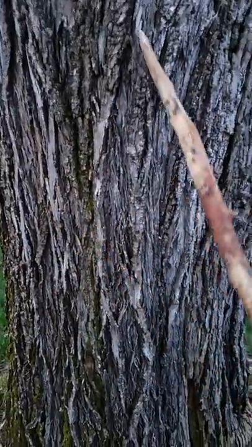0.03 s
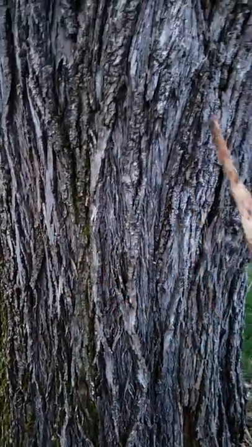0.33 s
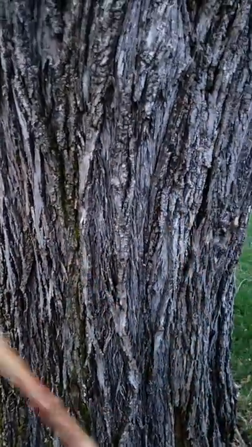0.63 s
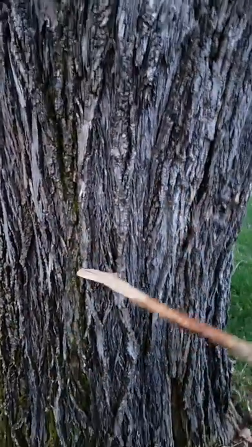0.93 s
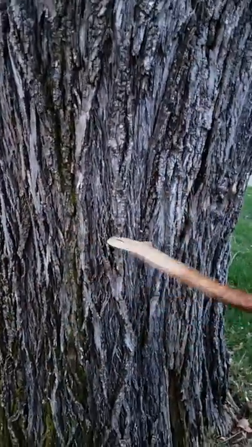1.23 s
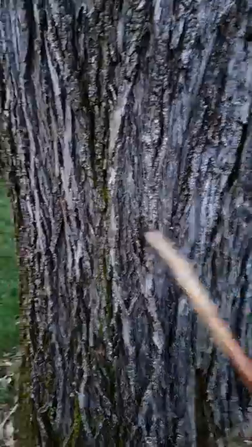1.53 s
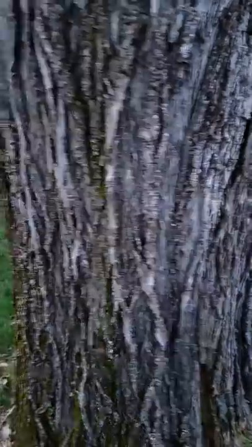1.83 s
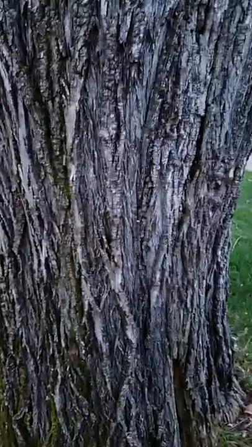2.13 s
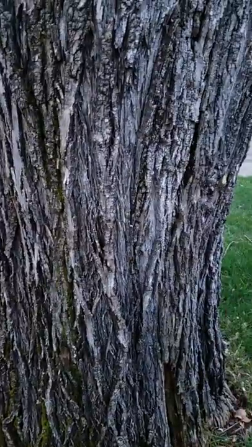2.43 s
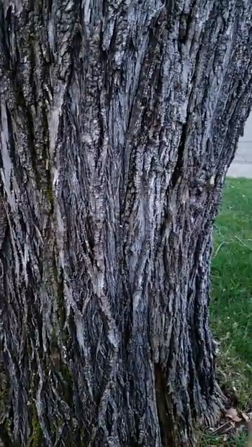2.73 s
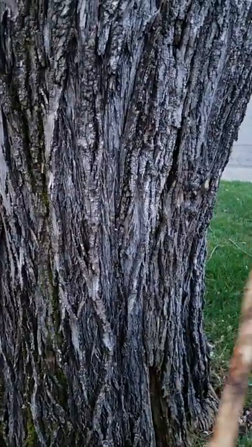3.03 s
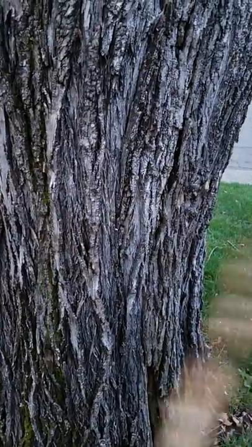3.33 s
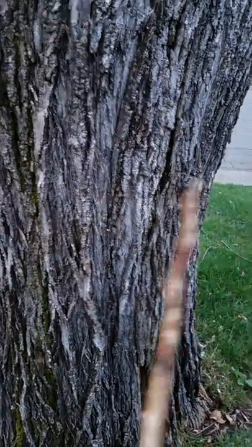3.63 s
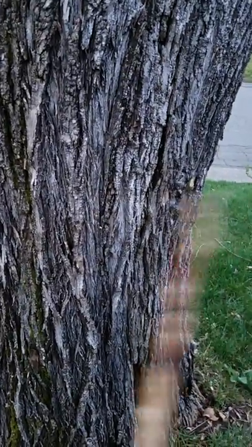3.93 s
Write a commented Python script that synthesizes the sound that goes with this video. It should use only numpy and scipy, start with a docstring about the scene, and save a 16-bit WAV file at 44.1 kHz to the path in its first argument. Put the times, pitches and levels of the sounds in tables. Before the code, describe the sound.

A wooden stick taps a tree trunk close by at about 0.3 and 0.7 seconds, followed by faint ticks and scrapes on the bark until 1.5. Sharp, dry strikes with a slight crunch land at 2.2 and 2.8 seconds, then the hardest at 3.3, 3.6 and 3.9. Faint town traffic hums outdoors throughout, with a barely audible distant siren falling and rising until about 2.3.

```python
"""Stick on a tree trunk

Outdoors in a garden, close to the microphone, a wooden stick taps, scrapes and then strikes a trunk.
Each contact rings the stick briefly, thocks the bark and crushes its crust; in hard blows the shaft
slaps down a few ms later. The garden returns a faint tail over low town noise and a very distant siren."""
import sys
import numpy as np
from scipy import signal
from scipy.fft import rfft, irfft
from scipy.io import wavfile
from scipy.ndimage import uniform_filter1d

SR = 44100
rng = np.random.default_rng(int(sys.argv[2]) if len(sys.argv) > 2 else 0)


def transcribe(signal):
    """Save signal, clipped to [-1, 1], as a 16-bit WAV file at the path in sys.argv[1]."""
    frames = np.atleast_2d(signal).T
    limited = np.clip(frames, -1, 1)
    pcm = np.round(limited * 32767).astype(np.int16)
    wavfile.write(sys.argv[1], SR, pcm)


N = 176400
T = np.arange(N) / SR
HIT_T = T[:8192]

# the tip meets the bark (time [s], stick ring [dB], stick tuning [ratio], thock pitch [Hz], thock [dB],
# rattle [dB], rattle tilt [dB/octave], crunch [dB])
TIP_KNOCKS = [(0.2594, -66, 1.4, 2000, -51, -51, -7.5, -28),
              (0.2622, -36, 1.02, 2510, -16.5, -29, -6.5, -42), (.27, -61, 1.3, 774, -39, -34, 5, -32.5),
              (0.288, -49, 0.92, 2280, -30, -35, -3.5, -32.5),
              (.3345, -46.5, 1.1, 1810, -32, -35, -16, -33.5), (.6718, -26.5, 1, 757, -14.5, -18, -7, -32),
              (0.6729, -37, 0.95, 2000, -12, -29.5, -3, -30), (.7318, -33, 1.11, 1740, -22, -32, -6, -37),
              (0.7421, -37, 1, 800, -42, -54, -8, -36), (0.777, -45.5, 1.05, 980, -48, -37, -16, -45.5),
              (1.004, -40, 1.18, 1590, -26.5, -37, -4.5, -41.5),
              (1.181, -39, 1.12, 1670, -38, -37, -5.5, -39),
              (2.1818, -24, 1.03, 745, -19, -23.5, -1.5, -28.5),
              (2.7502, -22.5, 0.98, 630, -28, -21, -3, -29),
              (3.3098, -20, 1.03, 2390, -5.5, -19.5, -5, -20),
              (3.5642, -19.5, 1, 2230, -7, -15.5, -1.5, -21), (3.89, -22, 1.065, 1750, -3.5, -19, -3, -26)]
# the shaft slaps the bark (time [s], level [dB], pitch [Hz])
SHAFT_SLAPS = [(2.1836, -15, 2740), (2.1899, -15, 2670), (2.753, -3.5, 3080), (3.313, -1, 3230),
               (3.5675, -6.5, 2670), (3.5727, -1.5, 3010), (3.8926, -3, 2750)]
# the tip drags over the bark; the last row is the stick swishing through the air (time [s], length [s], level
# [dB], resonance [Hz], relative grit [dB])
SCRAPES_AND_SWISH = [(-.02, 0.049, -46.5, 1170, 9), (0.765, 0.27, -64, 1910, 2), (1.005, 0.075, -59.5, 2230, 10),
                     (1.094, 0.094, -56, 2300, 10), (1.447, 0.039, -56, 1990, 40), (3.802, 0.2, -61.5, 2330, -18)]
# modes of the stick (frequency [Hz], relative level [dB], T60 [s])
STICK_MODES = [(297.3, -13, 0.059), (360.7, -7.5, 0.052), (469, -15, 0.072), (637, -17.5, 0.12),
               (698.6, -6.5, 0.043), (879, -14.5, 0.045), (1207, -7, 0.036), (1700, -22, 0.025),
               (1865, -8, 0.039), (2310, -9, 0.03), (2737, 6, 0.012), (4540, -31, 0.01)]
# spectra of loose bark, crust, slap, garden echoes and traffic (frequency [Hz], relative level [dB])
RATTLE_SPECTRUM = [(200, -29.5), (320, -4), (500, -8.5), (780, 3.5), (1000, -13.5), (2000, 2), (3300, 9.5),
                   (5500, -12.5), (16000, -41)]
CRUNCH_SPECTRUM = [(300, -26), (3500, 10), (6500, -10.5), (9000, -3), (16000, -1.5)]
SLAP_SPECTRUM = [(150, -36), (600, -15.5), (1400, -1), (2300, -20), (3300, 10), (6500, -4), (8500, -4),
                 (12000, -6.5), (16000, -23.5)]
GARDEN_SPECTRUM = [(100, -8), (300, 8), (700, 12), (1300, 7), (3000, 0.5), (8000, 5), (16000, 1.5)]
TOWN_SPECTRUM = [(15, -33.5), (28, -26), (60, -1.5), (85, -2), (120, -4), (175, -8), (260, -9), (350, -5),
                 (450, -7.5), (800, -10), (1250, -14.5), (2000, -22), (4000, -29), (7000, -37),
                 (10500, -35), (13000, -30.5), (16000, -30.5)]
# likeness of the traffic in left and right (frequency [Hz], coherence [0-1])
TOWN_COHERENCE = [(100, 0.95), (300, 0.81), (640, 0.57), (1400, 0.02), (3000, 0.04)]
# traffic at the microphone (time [s], level [dB])
TOWN_LEVELS = [(0, -59.5), (1.7, -60.5), (3.4, -59.5), (3.95, -56)]
# hums from the town (frequency [Hz], width [Hz], level [dB])
TOWN_HUMS = [(122.8, 6.3, -74.5), (356, 6.9, -73)]
# the distant siren (time [s], pitch [Hz], level [dB])
SIREN_WAIL = [(0, 1125, -61.5), (0.249, 1016, -74), (1, 869, -72), (1.459, 770, -68), (1.5, 1104, -92),
              (1.571, 1250, -68), (1.851, 1433, -75.5), (2.15, 1497, -78), (2.301, 1510, -86)]

# position at the microphone: delay and level of the left channel against the right
TIP_POSITION, SHAFT_POSITION = dict(lag_s=.00014, pan_db=1.2), dict(lag_s=.00045, pan_db=-.6)


def knocks():
    """Close up: the stick rings, the bark gives a dead thock, loose plates rattle, the crust crunches."""
    out, size = np.zeros((2, N)), len(HIT_T)
    hardest_db = max(row[5] for row in TIP_KNOCKS)
    thock_cycles, doubling_db = 10.7, 23
    for start, ring_db, tuning, thock_hz, thock_db, rattle_db, tilt_db, crunch_db in TIP_KNOCKS:
        ring = sum((-1) ** k * undb(db) * fade(t60, rise_s=.0016) * sine(hz * tuning)
                   for k, (hz, db, t60) in enumerate(STICK_MODES))
        thock = -fade(thock_cycles / thock_hz, rise_s=.00022) * sine(thock_hz)
        linger = 2 ** ((rattle_db - hardest_db) / doubling_db)  # softer blows die sooner
        rattle = colour(rng.standard_normal(size), RATTLE_SPECTRUM, tilt_db)
        rattle *= fade(t60_s=.043 * linger, rise_s=.00015)
        crunch = colour(grit(size), CRUNCH_SPECTRUM) * fade(t60_s=.045 * linger, rise_s=.00015)
        bark = undb(thock_db) * thock + undb(rattle_db) * rattle + undb(crunch_db) * crunch
        place(out, start, undb(ring_db) * ring + bark, **TIP_POSITION)
    return out


def slaps():
    """The shaft lands, hard wood on hard bark: a sharp click, a very short ring and a spray of chips."""
    out, crack = np.zeros((2, N)), click(SLAP_SPECTRUM)
    for start, db, hz in SHAFT_SLAPS:
        ring = fade(t60_s=.0051) * sine(hz)
        chips = colour(grit(len(HIT_T)), SLAP_SPECTRUM) * fade(t60_s=.024)
        slap = undb(3) * crack + undb(-4.5) * ring + undb(-19.5) * chips
        place(out, start, undb(db) * slap, **SHAFT_POSITION)
    return out


def scrapes(catch_s=.0015, catch_db=3):
    """The tip catches and slips on the crust: uneven clumps of fine cracks through a broad resonance. The same
    rough noise, faint and bright, makes the swish of the stick swinging near 3.8 s."""
    out, span = np.zeros((2, N)), N // 8
    clump = np.arange(span) // int(catch_s * SR)
    for start, length, db, hz, grit_db in SCRAPES_AND_SWISH:
        cracks = grit(span) * undb(catch_db * rng.standard_normal(span))[clump]
        rub = resonate(cracks, hz, hz / 2) + undb(grit_db) * colour(cracks, CRUNCH_SPECTRUM)
        size = int(length * SR)
        stroke = unit(rub[:size]) * signal.windows.tukey(size, .6)
        place(out, start, undb(db) * stroke, **TIP_POSITION)
    return out


def garden(stick, bounce_s=.02, bounce_top_hz=1550):
    """Around the microphone: scatter from close by, a faint longer tail, a dull bounce off the ground."""
    t, out = T[:N // 6], []
    dull = signal.butter(2, bounce_top_hz, fs=SR, output="sos")
    for channel in stick:
        echoes = [colour(rng.standard_normal(len(t)), GARDEN_SPECTRUM) * fade(t60_s, rise_s=.0037, t=t)
                  for t60_s in (.066, .19, .012)]
        near, far, ground = (echo / np.linalg.norm(echo) for echo in echoes)
        ground = signal.sosfilt(dull, np.roll(ground, int(bounce_s * SR)))
        response = undb(-14.5) * near + undb(-21) * far + undb(-21) * ground
        out.append(signal.fftconvolve(channel, response)[:N])
    return np.array(out)


def town():
    """Far traffic, centred in the bass and wide above, with two wavering hums and a thin hiss."""
    coherence = np.interp(np.arange(N // 2 + 1) * SR / N, *np.array(TOWN_COHERENCE).T)
    spectrum = gains(TOWN_SPECTRUM, N)
    mid, side = (irfft(rfft(rng.standard_normal(N)) * spectrum * np.sqrt(share), N)
                 for share in (1 + coherence, 1 - coherence))
    level = undb(np.interp(T, *np.array(TOWN_LEVELS).T))
    hum = sum(undb(db) * resonate(rng.standard_normal(N), hz, width) for hz, width, db in TOWN_HUMS)
    return level * unit(np.array([mid + side, mid - side])) + hum


def siren(flutter_depth=.54):
    """Very far off, a wail sinks slowly and climbs again, fluttering on its many paths to the garden."""
    times, hz, db = np.array(SIREN_WAIL).T
    phase = 2 * np.pi * np.cumsum(np.interp(T, times, hz)) / SR
    flutter = np.array([unit(uniform_filter1d(uniform_filter1d(noise, size=2000), size=2000))
                        for noise in rng.standard_normal((2, N))])
    return undb(np.interp(T, times, db)) * (np.sin(phase) + flutter_depth * flutter * np.cos(phase))


def undb(db):
    """Decibels to gain."""
    return 10 ** (np.asarray(db) / 20)


def unit(x):
    """Scale to rms 1."""
    return x / np.sqrt(np.mean(x ** 2))


def gains(points, size, tilt_db=0):
    """Gain per frequency bin from (frequency [Hz], level [dB]) points, tilted per octave about 1.5 kHz."""
    octave = np.log2(np.maximum(np.arange(size // 2 + 1) * SR / size, 1))
    hz, db = np.array(points).T
    return undb(np.interp(octave, np.log2(hz), db) + tilt_db * (octave - np.log2(1500)))


def colour(x, points, tilt_db=0):
    """Give a noise a spectrum; rms 1."""
    return unit(irfft(rfft(x) * gains(points, len(x), tilt_db), len(x)))


def click(points):
    """The shortest causal click with this spectrum; energy 1."""
    size = len(HIT_T)
    cepstrum = irfft(np.log(gains(points, size)))
    pulse = irfft(np.exp(rfft(2 * cepstrum * (np.arange(size) < size // 2))))
    return pulse / np.linalg.norm(pulse)


def resonate(x, hz, width_hz):
    """Pass twice through one resonance; rms 1."""
    peak = signal.iirpeak(hz, hz / width_hz, fs=SR)
    return unit(signal.lfilter(*peak, signal.lfilter(*peak, x)))


def sine(hz):
    """A pure tone for one hit."""
    return np.sin(2 * np.pi * hz * HIT_T)


def fade(t60_s, rise_s=1e-9, t=HIT_T):
    """Quick rise and exponential decay."""
    return (1 - np.exp(-t / rise_s)) * np.exp(-np.log(1000) * t / t60_s)


def grit(size, spread_db=4.5):
    """Dense tiny cracks of very unequal strength."""
    return rng.standard_normal(size) * undb(spread_db * np.minimum(rng.exponential(size=size), 5))


def place(out, start, sound, lag_s, pan_db):
    """Mix a sound in, reaching the left side of the microphone a little late."""
    for channel, delay, db in ((0, lag_s, pan_db / 2), (1, 0, -pan_db / 2)):
        onset = int(round((start + delay) * SR))
        part = sound[max(-onset, 0):N - onset]
        first = max(onset, 0)
        out[channel, first:first + len(part)] += undb(db) * part


def scene(low_cut_hz=242):
    """Stick and trunk up close, with hardly any bass; the garden around them, the town far behind."""
    low_cut = signal.butter(5, low_cut_hz, "high", fs=SR, output="sos")
    stick = signal.sosfilt(low_cut, knocks() + slaps() + scrapes())
    return stick + garden(stick) + town() + siren()


def record(dry):
    """The recorder cuts the top above 15.9 kHz."""
    return signal.sosfilt(signal.ellip(10, .2, 70, 15900, fs=SR, output="sos"), dry)


dry = scene()
out = record(dry)
transcribe(out)
```